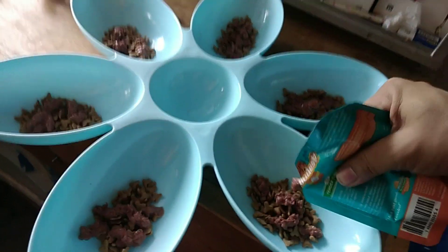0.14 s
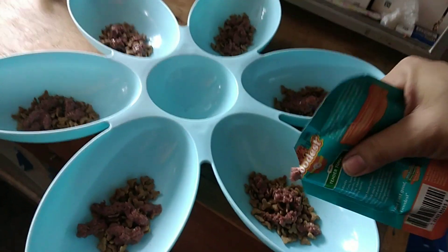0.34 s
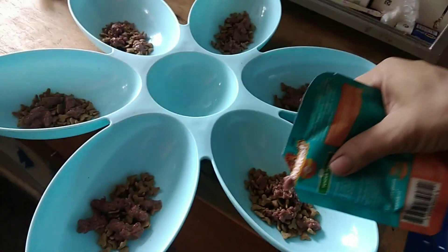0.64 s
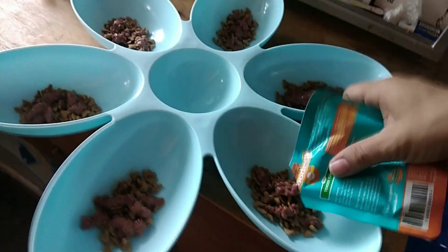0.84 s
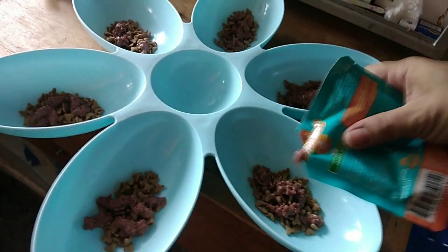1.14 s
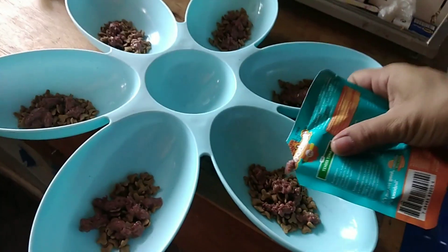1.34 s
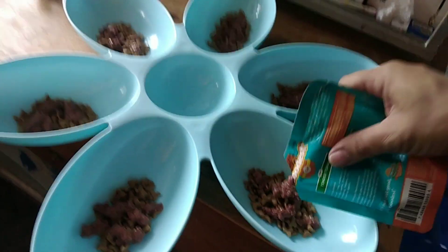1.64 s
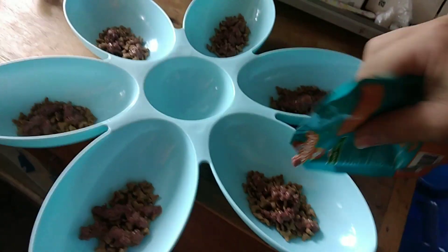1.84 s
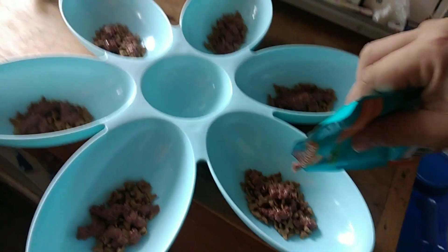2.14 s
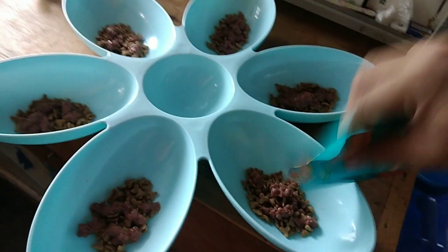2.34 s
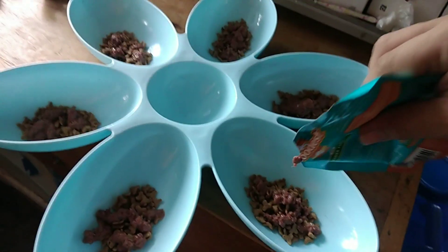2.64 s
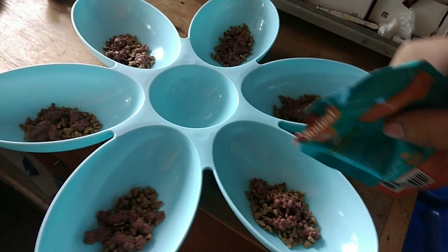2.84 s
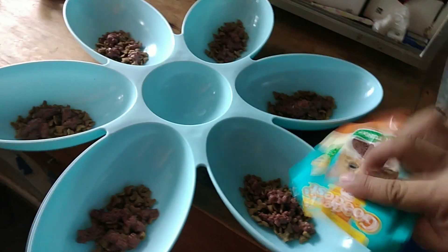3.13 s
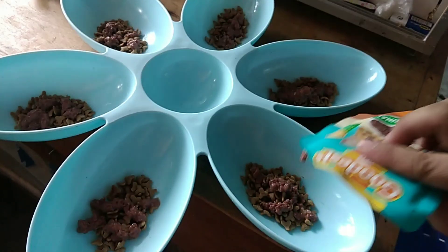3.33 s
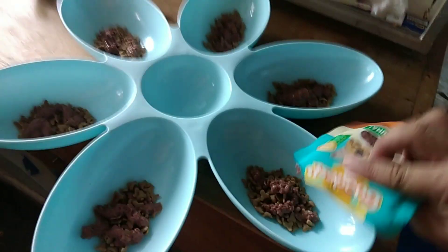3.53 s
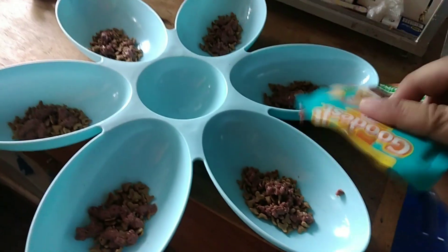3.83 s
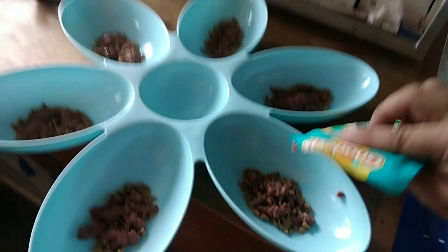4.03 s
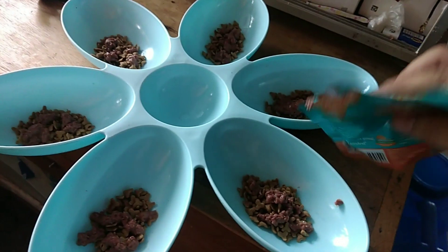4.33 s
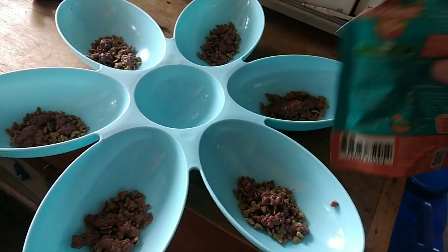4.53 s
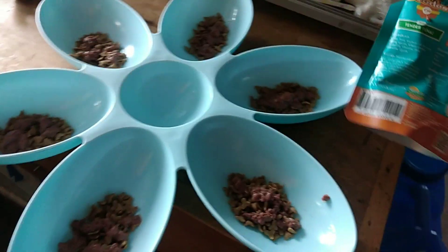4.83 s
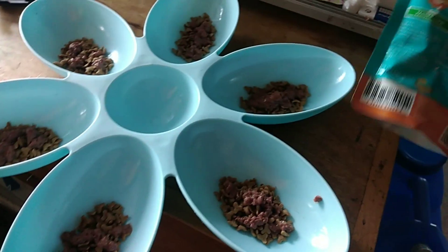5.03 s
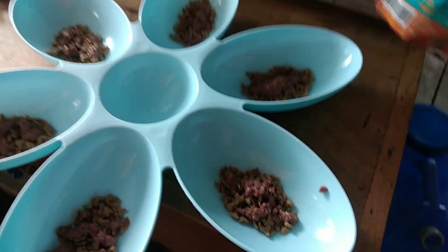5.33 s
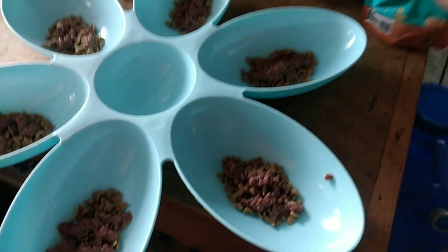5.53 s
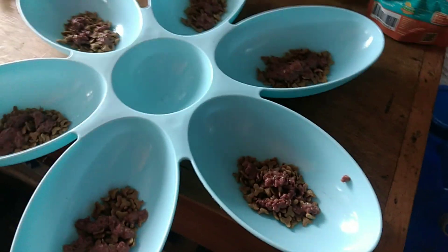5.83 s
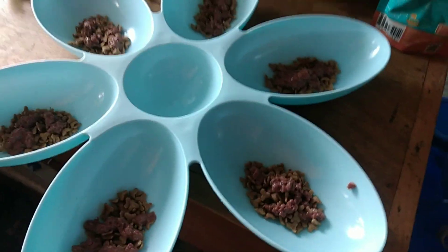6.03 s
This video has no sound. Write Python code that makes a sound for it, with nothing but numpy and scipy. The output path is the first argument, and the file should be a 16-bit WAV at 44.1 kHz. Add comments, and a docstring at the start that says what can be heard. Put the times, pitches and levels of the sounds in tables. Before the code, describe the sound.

Crisp foil rustles and dull plastic knocks repeat about every half second, then pause before hard loud clacks in a small humming room.

```python
"""A small room with a wooden table: a foil pouch is shaken and tapped on a thin plastic tray of feeding bowls.
Brief noisy contacts excite the bowl wall as sharp ticks; uneven snaps over noise make the rustle of foil
and dry food; decaying modes make the dull knocks of the tray bouncing on the table.
Decaying noise gives the answer of the room; behind it shaped noise makes an appliance hum, a narrow
whine, a dim hiss and faint air. A handheld recorder nearby limits the band; weak treble patches are dimmed."""
import sys
import numpy as np
from scipy import signal
from scipy.fft import rfft, irfft, next_fast_len
from scipy.io import wavfile
from scipy.ndimage import uniform_filter1d, map_coordinates

SR = 44100
rng = np.random.default_rng(int(sys.argv[2]) if len(sys.argv) > 2 else 0)


def how_loud(loudness_db):
    """Turn decibels into a plain amplitude multiplier (0 dB gives 1, 20 dB gives 10)."""
    steps = np.asarray(loudness_db, float) / 20
    return 10 ** steps


def generate_wav(signal):
    """Clip the signal to [-1, 1] and save it as 16-bit WAV at the path in sys.argv[1]."""
    frames = np.transpose(np.atleast_2d(signal))
    scaled = np.clip(frames, -1, 1) * 32767
    pcm = np.round(scaled).astype(np.int16)
    wavfile.write(sys.argv[1], SR, pcm)


N = 272091  # length in samples

# Levels are those ahead of the microphone; spectra set only the balance where their noise is scaled to rms 1.
# pouch edge on plastic: (time [s], treble energy [dB], clack re treble [dB], treble left-right [dB])
EDGE_TICKS = [(0.0681, 4, -2, 0), (0.1397, -1, -8, 11), (0.4872, 13.5, -9.5, 4), (0.524, -3.5, -20, 6.5),
              (0.8929, 12, -0.5, 9.5), (0.977, -13, -6.5, 4), (1.2478, -15, -4.5, 13), (1.2615, 0, 6, 2),
              (1.269, -11, -16.5, 19.5), (1.6527, 16, -5.5, 7), (1.6965, 5, -20.5, -15),
              (2.0312, 19, -3.5, 7), (2.0356, 8, -15, 2.5), (2.4169, 15.5, -0.5, 4.5),
              (3.181, 18, -8.5, -10), (3.518, 13.5, 3, 4.5), (3.968, 17, -6, -0.5), (5.465, 7, 9.5, -1),
              (5.473, 2.5, 2.5, 11.5), (5.521, -4, -15, -1), (5.8036, 7.5, 0.5, 8), (5.809, 15, -0.5, -5),
              (5.9916, -2, 4, 2)]
# rustles of foil and food: (time [s], rms level [dB], hold [s], low part re high part [dB], left-right [dB])
FOIL_RUSTLES = [(0.062, -56, 0.0023, 13, 5), (0.137, -44, 0.012, -2, 8.5), (0.322, -64, 0.11, -22, 5.5),
                (0.466, -57, 0.011, -8.5, 6.5), (0.488, -36, 0.0022, -2, -7),
                (.521, -24.5, 0.0035, -6.5, 0), (0.894, -26.5, 0.018, -6.5, 3),
                (0.916, -23, 0.028, -12.5, -3), (1.25, -39, .005, -2, 13.5), (1.265, -34, 0.022, -5, 3),
                (1.293, -23, .022, -8.5, -2), (1.653, -30, 0.016, -7.5, 4.5), (1.684, -26, .02, -11, -2),
                (1.824, -55.5, 0.024, -9, 0), (2.035, -32, 0.0079, 1.5, -2.5),
                (2.057, -42.5, .02, -23, -4.5), (2.421, -32, 0.017, -7, -2.5),
                (2.438, -37.5, 0.023, -12, -2), (2.828, -55, .06, -19.5, 4.5), (2.982, -58, .01, -11, 7.5),
                (3.078, -42.5, 0.045, -8.5, 3), (3.177, -26.5, 0.013, -2.5, 7.5), (3.2, -26, 0.033, -9, -5),
                (3.518, -29.5, 0.0053, -7, -0.5), (3.538, -26, 0.01, -11.5, -2.5),
                (3.939, -52.5, 0.022, -5.5, 6.5), (3.964, -29, 0.0082, -3.5, 5.5),
                (3.989, -29.5, 0.0061, -13, -4.5), (4.222, -66.5, 0.073, -35, 1),
                (4.321, -67.5, 0.066, -12, 9), (4.517, -62.5, 0.046, -42, 12.5),
                (4.726, -70, 0.0092, -30, 7), (4.895, -58, 0.05, -37.5, 8.5), (5.183, -74, .05, -12.5, -7),
                (5.39, -67.5, 0.058, -8, -5), (5.462, -22, 0.0055, -2, 2), (5.556, -46.5, 0.014, -25.5, 3),
                (5.609, -65.5, 0.039, -2, -3), (5.799, -19, 0.0099, -7.5, 0), (5.836, -61, 0.019, -8, -2),
                (5.983, -44.5, 0.0025, 5.5, -6.5), (6.037, -62.5, .06, 0, -1)]
# tray on table: (time [s], level of all modes together [dB], hardness [dB/octave], table-top boom [dB])
TRAY_KNOCKS = [(.496, -33.5, -3, -17.5), (.527, -23, -8, 12.5), (0.894, -21.5, -10.5, 1),
               (0.919, -17.5, -2, 7), (.931, -18.5, -8, -4), (.941, -19.5, -5.5, 8), (1.263, -19.5, 3, 1.5),
               (1.294, -11, -8, 5.5), (1.317, -7, -9.5, 2), (1.323, -11, -9.5, 9), (1.35, -20.5, -11, -18),
               (1.654, -20.5, -2, 8.5), (1.712, -11.5, -13.5, 2), (1.746, -19, -18, 5.5),
               (2.029, -17.5, -8, -5), (2.058, -23, -26, 4), (2.102, -15.5, -17.5, 6), (2.142, -22, -25, 6),
               (2.416, -23.5, -16, -4), (2.436, -28, -8.5, 1), (2.468, -26.5, -1, 14.5),
               (2.504, -27.5, -18, 5), (2.566, -42.5, 4, 15.5), (2.702, -47.5, -0.5, -0.5),
               (2.919, -49.5, -6.5, 8), (2.989, -50, -11.5, 14.5), (3.186, -16.5, -1.5, 11.5),
               (3.218, -19, -10, -3), (3.236, -26.5, -16.5, 2), (3.303, -25.5, -15.5, 9),
               (3.518, -19, -10, 7.5), (3.565, -27.5, -11, 8), (3.973, -26, -3.5, 6.5),
               (4.008, -26, -13, 12), (4.089, -42.5, -4, -12.5), (4.572, -41.5, -16, 22),
               (4.751, -55, -6.5, 13), (5.4655, 3.5, 5, -1.5), (5.47, -11, -6, 1.5), (5.488, -10, -2, -5.5),
               (5.803, -20.5, 3, -16), (5.811, 1.5, 7.5, 0), (5.991, -24, 9.5, 4.5)]
# modes of tray and table top: (nominal frequency [Hz], relative level [dB], t60 before blow strength [s])
TRAY_MODES = [(112.3, 1, 0.25), (170.8, -4, 0.16), (265.7, 2.5, 0.23), (318.8, 10.5, 0.065),
              (387, 3.5, 0.13), (430, -4, 0.097), (489, -5, 0.12), (581.4, -3, 0.13), (640, -1.5, 0.13),
              (733, -2.5, 0.12), (780, -3.5, 0.079), (898, 1.5, 0.044), (1036, -8, 0.074), (1176, 3, 0.037),
              (1326, -9, 0.088), (1434, -7.5, 0.11), (1630, 1.5, 0.043), (1910, -10.5, 0.044),
              (2350, -12, 0.037), (2680, -9, 0.049), (2780, -13, 0.016), (3830, -19, 0.017)]
# where the tray seems to ring: (frequency [Hz], left-right [dB])
TRAY_PAN = [(250, 1), (650, 4.5), (1300, 1.5), (3000, 1)]
# bowl wall under the tick: (frequency [Hz], width [Hz], level [dB])
BOWL_WALL = [(1400, 840, -3), (1962, 160, 6.5), (2780, 470, 1.5)]
# resonances of the microphone ports: (frequency [Hz], width [Hz], level [dB])
LEFT_PORT_MODES = [(5870, 3300, -11), (8760, 1370, 2.5), (12300, 2300, -23)]
RIGHT_PORT_MODES = [(6360, 2760, -0.5), (8100, 1900, 2), (11300, 6700, -23.5)]
# spectrum of the low rustle: (frequency [Hz], relative density [dB/Hz])
LOW_RUSTLE_SPECTRUM = [(400, -40.5), (900, -11), (2000, -6.5), (3500, -10), (5000, -8.5), (7000, -52)]
# decay of the room: (frequency [Hz], t60 [s])
ROOM_DECAY = [(150, 0.8), (600, .35), (1500, 0.47), (4000, 0.46), (9000, 0.34), (14000, 0.48)]
# spectra of the background noises: (frequency [Hz], relative density [dB/Hz])
HUM_SPECTRUM = [(20, -46), (60, 4), (146, 0), (194, -7), (235, 0), (323, -13), (421, -6.5), (600, -5),
                (730, -9.5), (780, -14), (960, -16.5), (1150, -12.5), (1350, -12), (1650, -34.5),
                (2100, -43)]
WHINE_SPECTRUM = [(6500, -36), (7100, -10), (7250, 10), (7550, -6.5), (7750, -22), (8600, -29.5),
                  (11000, -24.5), (13000, -50)]
HISS_SPECTRUM = [(1800, -21), (2100, -5), (2500, -2.5), (2800, -7.5), (3300, -31)]
AIR_SPECTRUM = [(1500, -2.5), (9000, -2), (12000, -6.5), (15500, -7.5)]
# unsteady tones in the hum: (frequency [Hz], middle amplitude [dB])
HUM_TONES = [(156, -57.5), (511, -78.5), (711, -61)]
# slow level course of the hum: (time [s], level [dB])
HUM_COURSE = [(0, -47), (2, -46), (3.2, -48.5), (4.2, -49.5), (5.2, -48.5), (6.17, -47)]
# chance level course of the narrow whine noise: (time [s], level [dB])
WHINE_CHANCE_LEVEL = [(0, -69.5), (1.1, -68), (1.97, -65), (2.4, -68), (2.9, -63), (3.5, -63), (3.75, -70),
                      (4.24, -70), (4.67, -78), (5.2, -68), (6.17, -67.5)]
# the dim hiss comes twice: (time [s], peak level over its rest [dB], rise constant [s], fall constant [s])
HISS_VISITS = [(3.23, -60.5, .08, .1), (6.05, -61.5, 0.25, 0.22)]
# left-right likeness of the background: (frequency [Hz], correlation)
LIKENESS = [(60, 0.77), (240, 0.88), (950, 0), (3770, 0), (15000, 0.032)]
# level under which weak treble patches are dimmed: (frequency [Hz], level per bin [dB])
WEAK_THRESHOLD = [(1300, -115), (1750, -92), (3000, -89.5), (6200, -85.5), (7400, -99), (8200, -94.5),
                  (10500, -91.5), (12500, -94.5), (15000, -92)]

HISS_REST_DB, AIR_DB = -82.5, -67
MIC_LOW_HZ, MIC_HIGH_HZ = 70.6, 13790
TABLE_HZ = 200  # modes below this belong to the table-top boom
SOFT_HZ, STIFF_HZ = 430, 850  # hardness tilts the modes only between these
CLACK_PAN_DB = 3.5  # the bowl wall sits a little to the left
LAG_S, LAG_SCATTER_S = .00012, .0002  # the right port hears a tick later; the spot changes from tap to tap
EDGE_SPREAD_DB, WALL_SPREAD_DB = -8, -12  # energy sent to the walls, re the direct tick
MAIN_IMPACT = 2.3  # added to the small impacts at the edge before the burst is scaled
LEAD_S, LEAD_DB = .0009, -20  # the foil edge touches just before the blow
RISE_S = 0.0021  # time constant of the onset of a rustle
# a hard jolt dies quickly, a gentle squeeze lingers: t60 at JOLT_DB, doubled for every so many dB below it
JOLT_DB, JOLT_T60_S, JOLT_DOUBLING_DB = -27.5, 0.081, 21
# a hard blow presses the tray down and damps it: ring time factor at 0 dB, doubled for every so many dB below
PRESSED, FREE_DOUBLING_DB = 0.59, 35.5


def unit(x):
    """Normalization: scale to rms 1."""
    return x / np.sqrt(np.mean(x ** 2) + 1e-20)


def along(points, hz):
    """Interpolation of (frequency [Hz], value) points on a logarithmic frequency axis."""
    f, v = np.transpose(points)
    return np.interp(np.log(hz + 1), np.log(f + 1), v)


def wobble(rate):
    """Slow random modulation: a smooth curve through rate random knots a second."""
    knots = rng.standard_normal(int(N * rate / SR) + 4)
    return map_coordinates(knots, [np.arange(N) * rate / SR])


def filtered(x, response):
    """Linear filtering: the spectrum of x times a complex response of frequency."""
    m = next_fast_len(x.shape[-1] + 8192)
    spectrum = rfft(x, m) * response(np.fft.rfftfreq(m, 1 / SR))
    return irfft(spectrum, m)[..., :x.shape[-1]]


def resonances(peaks):
    """Superposition of damped resonators (frequency [Hz], width [Hz], level [dB]) of alternating sign."""
    def response(f):
        total = 0
        for k, (centre, width, db) in enumerate(peaks):
            damping = 1j * f * width
            total = total + (-1) ** k * how_loud(db) * damping / (centre * centre - f * f + damping)
        return total
    return response


def coloured(spectrum):
    """Spectral shaping: a response that closes outside the (frequency [Hz], level [dB]) points."""
    return lambda f: how_loud(along(spectrum, f)) * (f > spectrum[0][0]) * (f < spectrum[-1][0])


def patchy(pair, patchy_db, bins, frames, size):
    """Random modulation: gain in patches of time and frequency, alike on both channels."""
    z = signal.stft(pair, nperseg=size)[2]
    field = uniform_filter1d(rng.standard_normal(z.shape[1:]), size=bins, axis=0)
    field = uniform_filter1d(field, size=frames, axis=1)
    return signal.istft(z * how_loud(patchy_db * unit(field)), nperseg=size)[1][:, :N]


def ports(pair):
    """Cavity resonance: treble passes through the resonances of each microphone port."""
    left = filtered(pair[0], resonances(LEFT_PORT_MODES))
    right = filtered(pair[1], resonances(RIGHT_PORT_MODES))
    return np.array([left, right])


def add(track, s, sound, pan_db=0, lag_s=0):
    """Level and time difference between two ports: the right one hears the sound lag_s later."""
    for channel, side in enumerate((1, -1)):
        start = round((s - side * lag_s / 2) * SR)
        track[channel, start:start + len(sound)] += how_loud(side * pan_db / 2) * sound


def ticks():
    """Impact excitation: a contact of about a millisecond drives the bowl wall and the bright edge.

    Second output: the same contacts averaged over all directions, as the walls hear them."""
    edge, wall = np.zeros((2, 2, 2, N + SR))  # each: direct, spread
    t = np.arange(200) / SR
    for s, db, clack_db, pan_db in EDGE_TICKS:
        envelope = (t / .0003) * np.exp(-t / .0003)
        burst = envelope * rng.standard_normal((2, len(t))) ** 3
        burst[1, 8] += 10  # the heavy bowl wall mostly feels the main impact
        burst[0, 8] += MAIN_IMPACT
        burst /= np.linalg.norm(burst, axis=1, keepdims=True)
        lag_s = LAG_S + LAG_SCATTER_S * rng.standard_normal()
        add(edge[0], s, how_loud(db) * burst[0], pan_db, lag_s)
        add(wall[0], s, how_loud(db + clack_db) * burst[1], CLACK_PAN_DB, lag_s)
        add(edge[0], s - LEAD_S, how_loud(db + LEAD_DB) * burst[0], pan_db, lag_s)
        add(edge[1], s, how_loud(db + EDGE_SPREAD_DB) * np.ones(1))
        add(wall[1], s, how_loud(db + clack_db + WALL_SPREAD_DB) * np.ones(1))
    return [ports(e[:, :N]) + filtered(w[:, :N], resonances(BOWL_WALL)) for e, w in zip(edge, wall)]


def crackle(per_s, spread_db, noise_share):
    """Random impulse process: dense tiny snaps of uneven size over fine noise."""
    present = rng.random(N) < per_s / SR
    snaps = present * how_loud(spread_db * rng.exponential(size=N)) * rng.standard_normal(N)
    return unit(noise_share * rng.standard_normal(N) + (1 - noise_share) * unit(snaps))


def rustle():
    """Crackling of foil creases and loose food: each shake swells fast, holds and decays exponentially."""
    high, low = np.zeros((2, 2, N + SR))
    t = np.arange(SR // 2) / SR
    for s, db, hold_s, low_db, pan_db in FOIL_RUSTLES:
        t60 = JOLT_T60_S * 2 ** ((JOLT_DB - db) / JOLT_DOUBLING_DB)
        swell = (1 - np.exp(-t / RISE_S)) * how_loud(db - 60 * np.maximum(t - hold_s, 0) / t60)
        add(high, s, swell, pan_db)
        add(low, s, swell * how_loud(low_db), .5 * pan_db)
    grains = crackle(per_s=3000, spread_db=2.8, noise_share=.3)
    grains = grains * how_loud(3 * wobble(130))
    pair = np.array([grains, np.roll(grains, 6)]) + 1.1 * rng.standard_normal((2, N))
    # each crease and crumb has its own pitch
    pair = patchy(pair, patchy_db=4, bins=4, frames=3, size=128)
    soft = unit(filtered(pair, coloured(LOW_RUSTLE_SPECTRUM)))
    return high[:, :N] * unit(ports(pair)) + low[:, :N] * soft


def knocks():
    """Modal synthesis: each bounce rings the tray at new strengths; hardness tilts the balance of its modes."""
    out = np.zeros((2, N + SR))
    t = np.arange(SR // 2) / SR
    onset = 1 - np.exp(-t / 0.000095)
    hz, level_db, t60 = np.transpose(TRAY_MODES)[:, :, None]
    for s, db, hardness_db, boom_db in TRAY_KNOCKS:
        stretch = PRESSED * 2 ** (-db / FREE_DOUBLING_DB)
        draw = rng.standard_normal((3, len(TRAY_MODES), 1))  # strength, tuning, phase
        # the tilt ends at the stiffness of the pouch
        tilt_db = hardness_db * np.log2(np.clip(hz, SOFT_HZ, STIFF_HZ) / 300)
        strength = how_loud(level_db + boom_db * (hz < TABLE_HZ) + tilt_db + 2 * draw[0])
        strength *= (-1) ** np.arange(len(TRAY_MODES))[:, None]
        strength /= np.linalg.norm(strength)
        for side, channel in enumerate(out):
            # long waves reach both ports alike, short ones out of step
            phase_gap = side * draw[2] * np.minimum(hz / 900, 2) ** 2
            phase = 2 * np.pi * hz * (1 + 0.023 * draw[1]) * t + phase_gap
            decay = how_loud((.5 - side) * along(TRAY_PAN, hz) - 60 * t / (t60 * stretch))
            ring = (strength * decay * np.sin(phase)).sum(0) * onset
            channel[round(s * SR):][:len(t)] += how_loud(db) * ring
    return out[:, :N]


def room(x, piece=SR // 4):
    """Reverberation: each frequency dies at its own speed; every quarter second gets a fresh random tail."""
    out = np.zeros((2, N + SR))
    for start in range(0, N, piece):
        hz, t, z = signal.stft(rng.standard_normal((2, SR // 2)), SR, nperseg=256)
        decay = how_loud(-60 * t / along(ROOM_DECAY, hz)[:, None])
        tail = signal.istft(z * decay, SR, nperseg=256)[1]
        wet = signal.fftconvolve(x[:, start:start + piece], tail / np.linalg.norm(tail[0]), axes=1)
        first = start + 130  # the answer begins 130 samples after the sound
        out[:, first:first + wet.shape[1]] += wet
    return out[:, :N]


def rush(spectrum, patchy_db):
    """Partial coherence: stereo noise of rms 1 whose mid and side shares set the left-right likeness."""
    pair = patchy(rng.standard_normal((2, N)), patchy_db, bins=3, frames=10, size=512)

    def mid_side(hz):
        angle = np.arccos(np.clip(along(LIKENESS, hz), -1, 1)) / 2
        return coloured(spectrum)(hz) * [np.cos(angle), np.sin(angle)]

    mid, side = filtered(pair, mid_side)
    return unit(np.array([mid + side, mid - side]))


def background():
    """Coloured noise, slowly modulated: appliance hum with unsteady tones, whine, dim hiss and faint air."""
    t = np.arange(N) / SR
    hum_db = np.interp(t, *np.transpose(HUM_COURSE)) + 0.97 * wobble(2.5)
    hum = how_loud(hum_db) * rush(HUM_SPECTRUM, patchy_db=2.25)
    whine_db = np.interp(t, *np.transpose(WHINE_CHANCE_LEVEL)) + 2.5 * wobble(37)
    whine = how_loud(whine_db) * rush(WHINE_SPECTRUM, patchy_db=2.5)
    tones = sum(how_loud(db + 2 * wobble(8)) * np.sin(2 * np.pi * hz * t + wobble(8)) for hz, db in HUM_TONES)
    swells = 0
    for s, db, rise_s, fall_s in HISS_VISITS:
        swells = swells + how_loud(db) * np.exp(-np.abs(t - s) / np.where(t < s, rise_s, fall_s))
    hiss = (how_loud(HISS_REST_DB) + swells) * rush(HISS_SPECTRUM, patchy_db=1.0)
    return hum + whine + hiss + tones + how_loud(AIR_DB) * rush(AIR_SPECTRUM, patchy_db=2)


def scene():
    """Superposition of pouch, tray, the answer of the room and the background."""
    (tick, spread), foil, tray = ticks(), rustle(), knocks()
    answer = room(how_loud(-7.5) * spread + how_loud(-14.5) * foil + how_loud(-18.5) * tray)
    return tick + foil + tray + answer + background()


def drop_weak(x):
    """Level-dependent gain: treble patches that sink under the threshold are turned down by up to 14 dB."""
    hz, _, z = signal.stft(x, SR, nperseg=1536, noverlap=1152)
    power = uniform_filter1d(np.abs(z) ** 2, size=4, axis=1)
    power = uniform_filter1d(power, size=3, axis=2)
    over = (power / how_loud(2 * along(WEAK_THRESHOLD, hz))[:, None]) ** 3
    gain = np.maximum(over / (1 + over), how_loud(-14))
    return signal.istft(z * gain, SR, nperseg=1536, noverlap=1152)[1][:, :N]


def microphone(hz):
    """Band limitation: a third-order low cut and a steep high cut without phase shift."""
    low_cut = (1j * hz / (MIC_LOW_HZ + 1j * hz)) ** 3
    return low_cut / np.sqrt(1 + (hz / MIC_HIGH_HZ) ** 16)


def band_limit(x):
    """A steep low-pass at the top of the band."""
    return signal.sosfilt(signal.butter(12, 15810, fs=SR, output="sos"), x)


def record(dry):
    """Recording chain: microphone band limits, dimming of weak treble, then clipping of the loudest peaks."""
    heard = filtered(dry, microphone)
    clipped = np.clip(drop_weak(heard), -.94, .94)
    return band_limit(clipped)


dry = scene()
out = record(dry)
generate_wav(out)
```